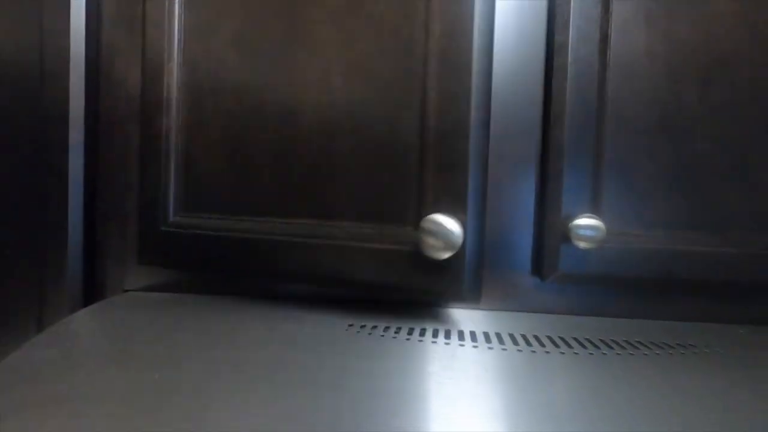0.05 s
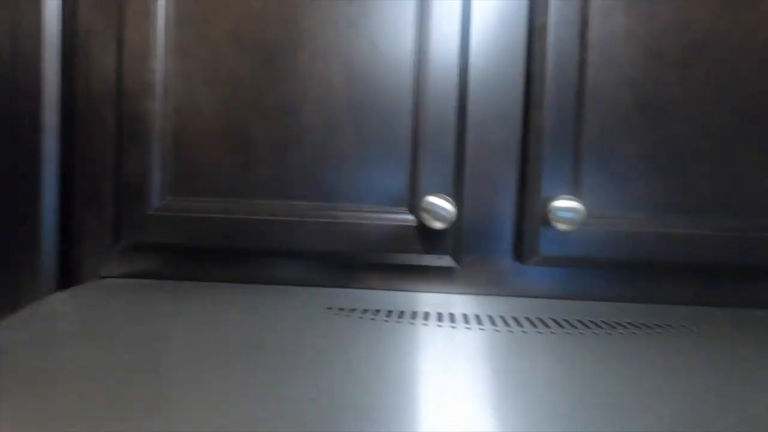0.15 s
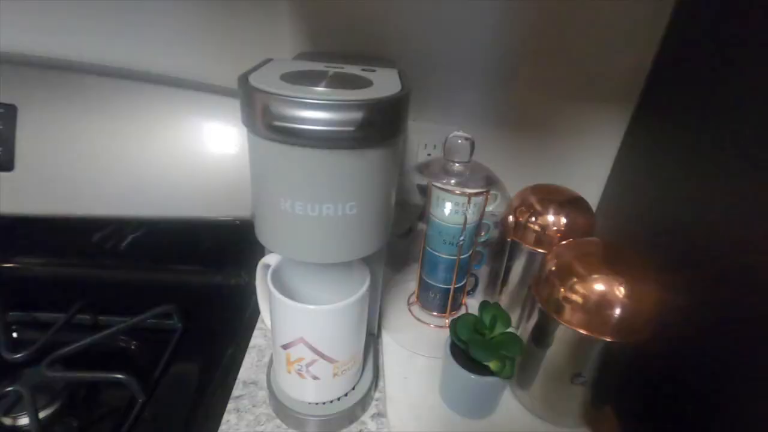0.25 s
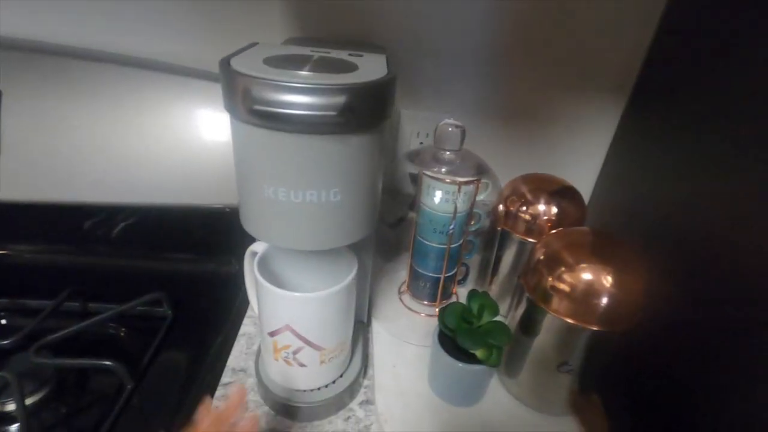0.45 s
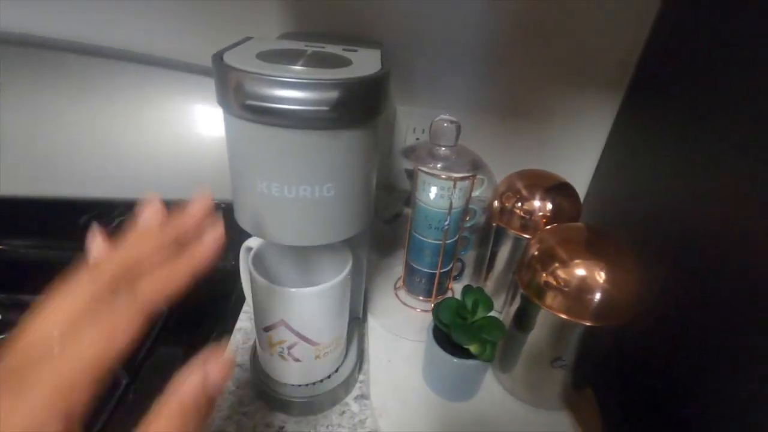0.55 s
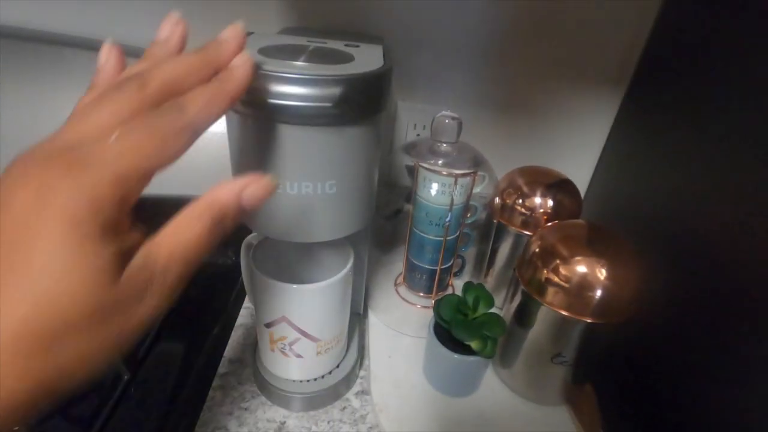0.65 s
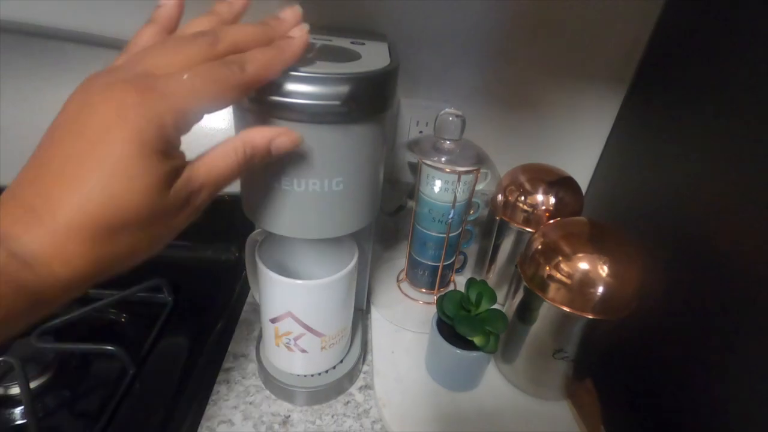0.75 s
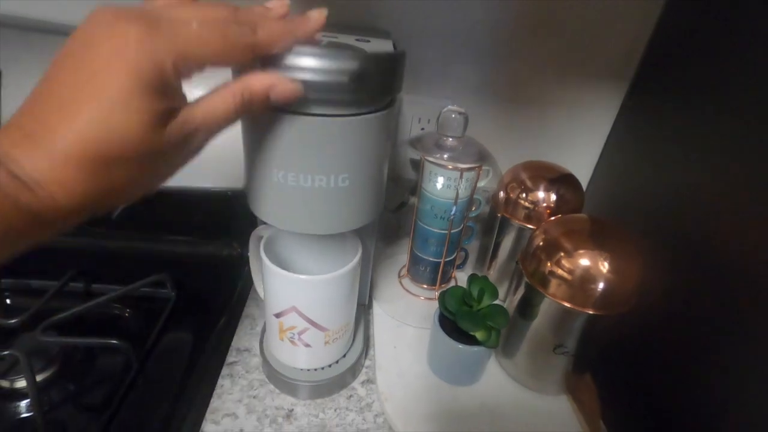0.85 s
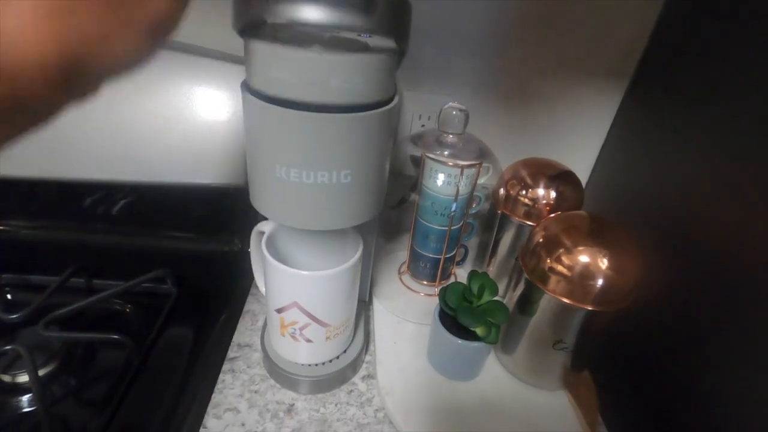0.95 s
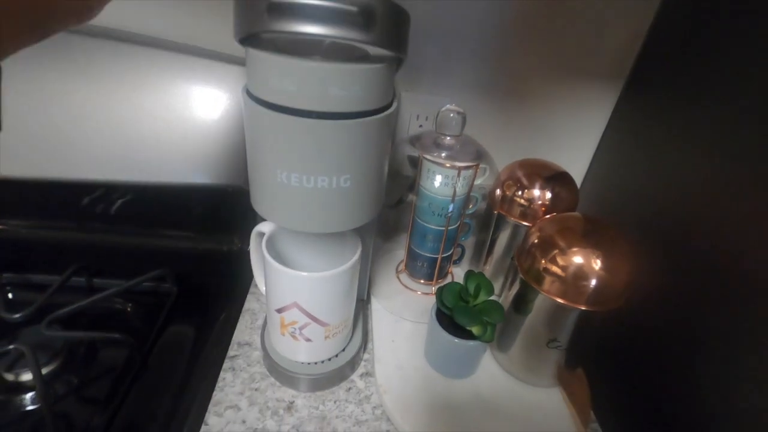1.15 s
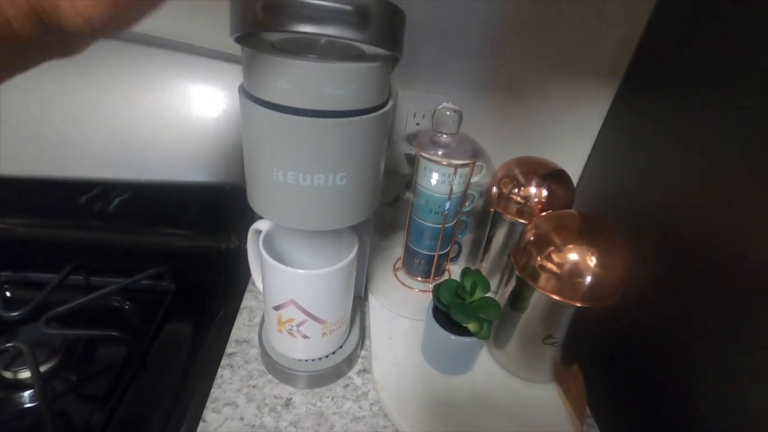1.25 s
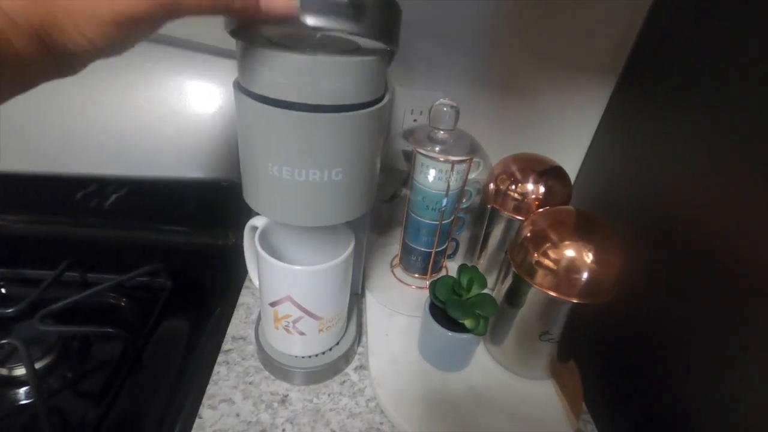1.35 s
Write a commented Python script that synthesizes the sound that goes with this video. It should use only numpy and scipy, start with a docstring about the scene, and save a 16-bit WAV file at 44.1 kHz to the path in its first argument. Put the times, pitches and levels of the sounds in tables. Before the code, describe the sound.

A coffee maker's plastic lid scrapes, snaps free and rattles to rest close to the microphone. Just before it, a wooden cabinet door thumps shut and a light knock follows. An appliance hums in the quiet kitchen.

```python
"""A quiet kitchen; an appliance hums throughout.
First a wooden cabinet door thumps shut, its ring cut off short by an edit as the level dips briefly.
A light knock follows, then a faint hiss. From about 0.8 s, close to the microphone, a hand unlatches
a coffee maker's plastic lid: it scrapes, snaps free, swings up and rattles to rest.
The hollow housing thuds under it and the hard walls answer."""
import sys
import numpy as np
from scipy import signal
from scipy.fft import rfft, irfft, next_fast_len
from scipy.io import wavfile
from scipy.ndimage import uniform_filter1d

SR = 44100
rng = np.random.default_rng(int(sys.argv[2]) if len(sys.argv) > 2 else 0)


def to_wav(sig):
    """Store sig (one row per channel, or 1-D mono) as 16-bit WAV at the path in sys.argv[1].

    Samples outside -1..1 are clipped; the rate is SR.
    """
    pcm = np.clip(np.atleast_2d(sig), -1, 1) * 32767
    pcm = np.round(pcm).astype(np.int16)
    wavfile.write(sys.argv[1], SR, pcm.T)  # frames by channels


N = 61739
T = np.arange(N) / SR
AGE = T[:SR // 3]  # seconds since a blow

# Levels in mode and colour tables are relative.
# appliance hum (f/Hz, rms level/dB)
HUM_TONES = [(119.5, -45), (240.5, -51.5), (329, -49.5)]
# colour of the room tone (f/Hz, level/dB)
ROOM_TONE_COLOUR = [(15, -57), (25, -11.5), (60, -20.5), (103, -12.5), (172, -12), (257, -6), (604, -18),
                    (850, -24), (2300, -31.5), (3700, -39.5), (10600, -61.5), (15000, -77)]
# slow drift of the room tone (t/s, rms level/dB)
ROOM_TONE_DRIFT = [(0, -42.5), (.55, -40), (1.4, -44)]
# colour of the faint hiss (f/Hz, level/dB)
HISS_COLOUR = [(1000, -54), (6000, -49.5), (10500, -49.5), (14000, -71)]

# modes of the door panel and of its frame (f/Hz, level/dB, t60/s)
DOOR_MODES = [(132.5, 0, 0.27), (234, -3.5, 0.19), (289.5, -6.5, 0.16), (330, -10, 0.16),
              (370.7, -11.5, 0.24), (529, -12.5, 0.17), (601, -18, 0.38), (712, -22.5, 0.15)]
FRAME_MODES = [(400, -3, .022), (680, -8, .022), (980, -22, .02), (4400, -16, .009)]
# colours of the door's first contact and of its hinge rattle (f/Hz, level/dB)
TICK_COLOUR = [(40, -12), (200, -5), (550, -12), (1100, -0.5), (2500, -6.5), (4600, -9), (6100, -14.5),
               (7600, -19), (11000, -39.5), (15000, -61)]
RATTLE_COLOUR = [(30, -27), (70, -20), (200, 4.5), (600, -1.5), (1400, -13), (1800, -17), (2300, -13.5),
                 (2800, -23), (3400, -19.5), (6000, -37), (11000, -52), (15000, -82)]

# the knock and its bounce (t/s, level/dB, crack against ring/dB)
KNOCKS = [(.2918, -9, -4), (0.3164, -16, -20)]
# modes the knock excites (f/Hz, level/dB, t60/s)
KNOCK_MODES = [(525, -16, .08), (860, -10, .025), (1005, -11, .07), (1070, 1.5, .015), (3400, -9, .013)]
# colours of the knock's contact and of its soft trailing noise tail (f/Hz, level/dB)
KNOCK_COLOUR = [(40, -33), (170, -18), (500, -20), (1100, 7.5), (2000, 1.5), (5500, -6.5), (7000, -20),
                (11000, -30), (15000, -40)]
NOISE_TAIL_COLOUR = [(40, -23), (170, -12), (500, -11), (2000, -27.5), (7000, -36.5), (10500, -40), (14000, -68)]

# jolts of the housing (t/s, deep level/dB, hollow level/dB)
THUDS = [(0.83, -36, -27), (0.882, -25.5, -25.5), (0.902, -24, -33.5), (0.9344, -32, -16.5),
         (.979, -16, -23.5), (1.03, -27, -24.5), (1.055, -33, -32.5), (1.088, -31.5, -29)]
# deep and hollow modes of the housing (f/Hz, level/dB, t60/s)
DEEP_MODES = [(112, -3, 0.074), (164.3, 0, 0.093), (220.5, -1.5, 0.1), (282, -3.5, 0.19),
              (400.5, -14, 0.17)]
HOLLOW_MODES = [(522, -1, .09), (585, -6, .06), (735, -8, .06)]
# modes of the latch and of the plastic lid (f/Hz, level/dB, t60/s)
LATCH_MODES = [(865, -4, .045), (1130, -6, .016), (1900, 1.5, .022), (2400, -4, .02)]
LID_MODES = [(680, -10, .05), (780, -13, .05), (868, -11, .065), (1320, -16, .04), (1510, -9, .04),
             (1850, -10, .035), (1990, -11, .05), (2450, -6, .025), (2550, -.5, .015), (2595, -15, .05),
             (2640, -14.5, .09), (3240, -15, .035)]
# catches of the lid (t/s, ring level/dB, crack level/dB in each of CRACK_BANDS, contact length/s)
LID_CLICKS = [ (0.874, -52, -21, -26, -37, -32, -64, 0.011),
              (0.8835, -29, -22, -23.5, -19, -20, -41.5, 0.005),
              (0.8918, -42, -14, -18, -25, -34, -54, 0.0086),
              (0.9014, -20.5, -13.5, -14.5, -10.5, -20.5, -34, 0.0028),
              (.9330, -37, -19.5, -19.5, -36, -44, -57, 0.012),
              (0.9646, -31, -6.5, -3, -10, -18.5, -31, 0.0035),
              (.9770, -5, -11.5, -7, -13.5, -14.5, -28.5, 0.0058),
              (1.027, -10.5, -20, -9.5, -6, -15.5, -19.5, 0.0074),
              (1.0511, -9.5, -13.5, -11, -20, -22.5, -37, 0.0062),
              (1.0902, -33, -19, -17.5, -14.5, -20.5, -32, 0.0039),
              (1.111, -25, -32, -19, -22, -37, -49, 0.0035), (1.13, -50, -25, -44, -42, -40, -47, 0.0025),
              (1.1445, -28, -36.5, -22.5, -23.5, -38.5, -45, 0.0032),
              (1.156, -37, -22.5, -28, -31, -51, -55, 0.0031)]
# bands that shape each crack (f/Hz)
CRACK_BANDS = [750, 1800, 3600, 6000, 10000]
# broad resonances of the plastic shell, and colour of its dense after-ring (f/Hz, level/dB)
SHELL_COLOUR = [(40, -35.5), (130, 3.5), (450, -2.5), (880, -1), (1200, -3.5), (1950, 3), (2200, -2.5),
                (2520, 4.5), (2900, 0.5), (3230, 0.5), (3500, -0.5), (3900, -1), (7500, 0.5), (8250, -6),
                (9150, 2.5), (12000, -6.5)]
AFTER_RING_COLOUR = [(600, 14), (2600, 3), (5000, 5)]

LID_PUSH_S = .002  # build-up of the lid's and the latch's ring


def amp(db):
    """Decibels to gain."""
    return 10 ** (np.asarray(db) / 20)


def fade(t60):
    """Exponential decay, 60 dB down after t60 seconds."""
    return np.exp(-np.log(1000) * AGE / t60)


def at(x, s):
    """Delay a sound to start at s seconds."""
    return np.concatenate([np.zeros(int(max(s, 0) * SR)), x, np.zeros(N)])[:N]


def colour(x, points):
    """Causal filter through (f/Hz, level/dB) points."""
    hz, db = np.array(sorted(points)).T
    size = 2 * next_fast_len(len(x) // 2 + 2048, real=True)
    f = np.maximum(np.arange(size // 2 + 1) * SR / size, 1)
    gain = amp(np.interp(np.log(f), np.log(hz), db))
    cepstrum = irfft(np.log(gain))
    cepstrum[1:size // 2] *= 2  # fold to minimum phase: nothing sounds before the blow
    cepstrum[size // 2 + 1:] = 0
    return irfft(rfft(x, size) * np.exp(rfft(cepstrum)))[:len(x)]


def burst(envelope):
    """A dense cluster of micro-impacts of random sign under an envelope."""
    return np.sign(rng.standard_normal(len(envelope))) * envelope


def ring(modes, push_s, scatter_db=0, detune=0):
    """Decaying modes that build up during the push, with optional scatter of level and pitch."""
    chance = rng.standard_normal((len(modes), 2))
    out = 0
    for k, (hz, db, t60) in enumerate(modes):
        wave = np.sin(2 * np.pi * hz * (1 + detune * chance[k, 1]) * AGE)
        out += (-1) ** k * amp(db + scatter_db * chance[k, 0]) * fade(t60) * wave
    return out * np.minimum(AGE / push_s, 1)


def background():
    """The bed of the scene: a steady appliance hum over soft, dark room tone."""
    air = colour(rng.standard_normal(N), ROOM_TONE_COLOUR)
    air_db = np.interp(T, *np.array(ROOM_TONE_DRIFT).T)
    hum = sum(amp(db) * np.sqrt(2) * np.sin(2 * np.pi * (hz * T + rng.random())) for hz, db in HUM_TONES)
    return hum + air / air.std() * amp(air_db)


def kitchen(x, wet_db):
    """Cupboards and walls answer diffusely, 8 ms behind the direct sound; the treble dies sooner."""
    noise = rng.standard_normal(len(AGE))
    low = signal.sosfilt(signal.butter(2, 1900, fs=SR, output="sos"), noise)
    treble = noise - low
    tail = at(low * fade(t60=.32) + treble * fade(t60=.21), s=.008)
    return x + amp(wet_db) * signal.fftconvolve(x, tail / np.linalg.norm(tail))[:N]


def hiss():
    """A faint high hiss swells and fades after the knock."""
    peak_s, rise_s, fall_s = .393, .02, .036
    swell = np.exp(-np.maximum((peak_s - T) / rise_s, (T - peak_s) / fall_s))
    return swell * colour(rng.standard_normal(N), HISS_COLOUR)


def knocks():
    """A light hard knock with a small bounce and a soft, dark noise tail."""
    noise_tail = colour(burst(fade(t60=.18)), NOISE_TAIL_COLOUR)
    out = at(noise_tail, KNOCKS[0][0])
    for s, db, crack_db in KNOCKS:
        crack = amp(crack_db) * colour(burst(fade(t60=.015)), KNOCK_COLOUR)
        out += at(amp(db) * (ring(KNOCK_MODES, push_s=.0011) + crack), s)
    return out


def door():
    """The door ticks and clacks against its frame, then the panel booms and the hinges rattle."""
    tick = colour(burst(fade(t60=.011)), TICK_COLOUR)
    clack = ring(FRAME_MODES, push_s=.0018)
    boom = amp(-3.5) * ring(DOOR_MODES, push_s=.008)
    rattle = colour(burst(fade(t60=.3)), RATTLE_COLOUR)
    return at(tick, s=.2175) + at(clack, s=.2178) + at(boom + rattle, s=.2185)


def housing():
    """The coffee maker's hollow body thuds as the hand and the lid jolt it."""
    deep = ring(DEEP_MODES, push_s=.0025)
    hollow = ring(HOLLOW_MODES, push_s=.0025)
    return sum(at(amp(deep_db) * deep + amp(hollow_db) * hollow, s) for s, deep_db, hollow_db in THUDS)


def latch():
    """The latch springs free with a hollow clack."""
    return at(amp(-7) * ring(LATCH_MODES, LID_PUSH_S), s=.9648)


def catch(contact_s):
    """Plastic catching on plastic: uneven micro-slips build up, last for the contact and die away."""
    rise_s, release_t60_s, spread_db = .0008, .011, 5.5
    release = np.exp(-np.log(1000) * np.maximum(AGE - contact_s, 0) / release_t60_s)
    envelope = np.minimum(AGE / rise_s, 1) * release
    slips = burst(envelope) * amp(spread_db * rng.standard_normal(len(AGE)))
    return slips * np.linalg.norm(envelope) / np.linalg.norm(slips)


def lid():
    """Close up, each catch of the lid or hinge cracks through the shell and briefly rings the plastic."""
    cracks, rings = 0, 0
    for s, ring_db, *crack_db, contact_s in LID_CLICKS:
        after_ring = amp(-10) * colour(burst(fade(t60=.06)), AFTER_RING_COLOUR)
        # the crack falls away below its lowest band and above its highest
        spectrum = [(98.2, crack_db[0] - 8), *zip(CRACK_BANDS, crack_db), (14000, crack_db[-1] - 23.5)]
        cracks += at(colour(catch(contact_s) + after_ring, spectrum), s)
        rings += at(amp(ring_db) * ring(LID_MODES, LID_PUSH_S, scatter_db=2, detune=.005), s)
    return colour(cracks, SHELL_COLOUR) + rings


def scene():
    """Mono: the dry door thump is cut off by an edit; after a brief dip, knock and lid sound in the room."""
    dip_start_s, dip_end_s, dip_db = .2845, .2915, -16
    before_dip = 1. * (T < dip_start_s)
    after_dip = uniform_filter1d(1. * (T > dip_end_s), size=24)
    bed = background() * np.maximum(before_dip + after_dip, amp(dip_db))
    coffee_maker = kitchen(latch() + lid() + housing(), wet_db=-11.5)
    cabinet = before_dip * door()
    knocking = kitchen(knocks(), wet_db=-12)
    return (bed + hiss() + knocking + cabinet + coffee_maker)[None]


def record(dry):
    """The microphone rounds the loudest peaks and cuts the top above 16.3 kHz."""
    rounded = dry / (1 + dry ** 6) ** (1 / 6)
    return signal.sosfilt(signal.ellip(8, .2, 80, 16300, fs=SR, output="sos"), rounded)


dry = scene()
out = record(dry)
to_wav(out)
```